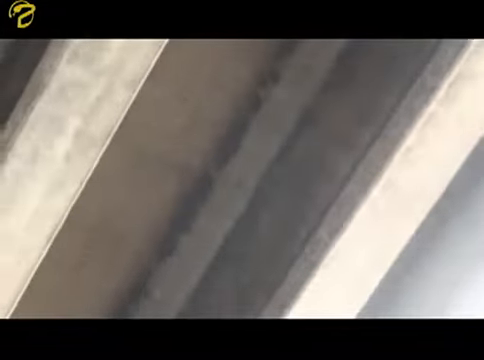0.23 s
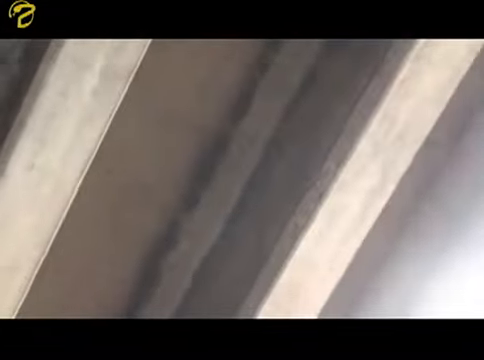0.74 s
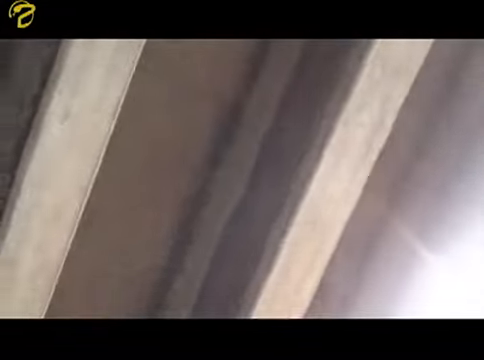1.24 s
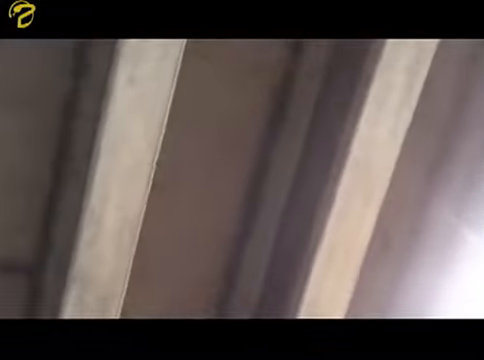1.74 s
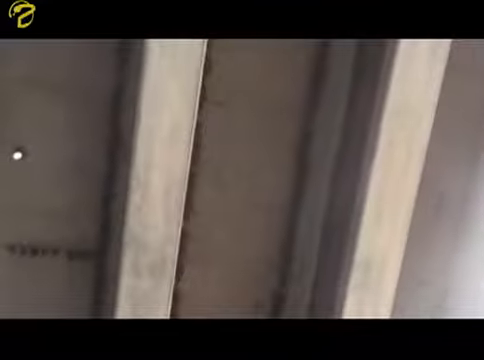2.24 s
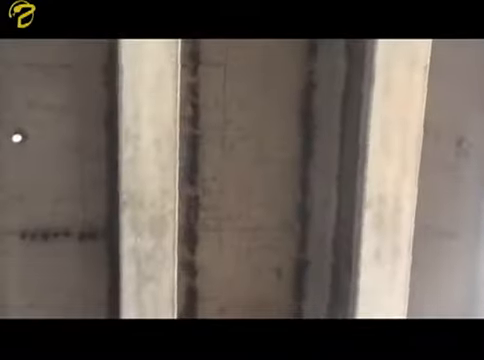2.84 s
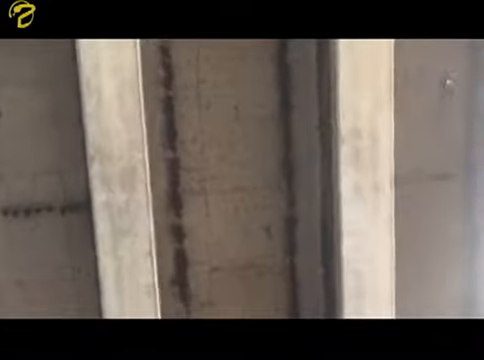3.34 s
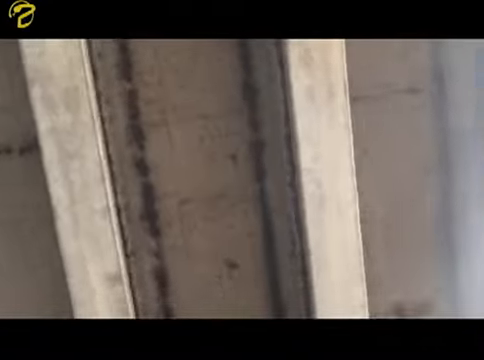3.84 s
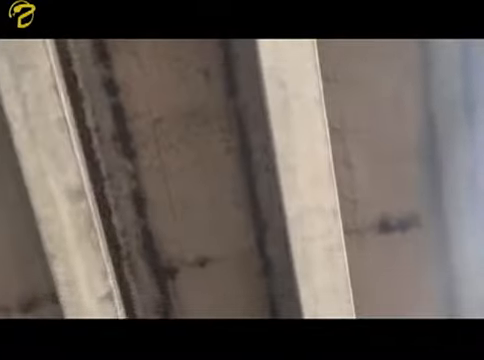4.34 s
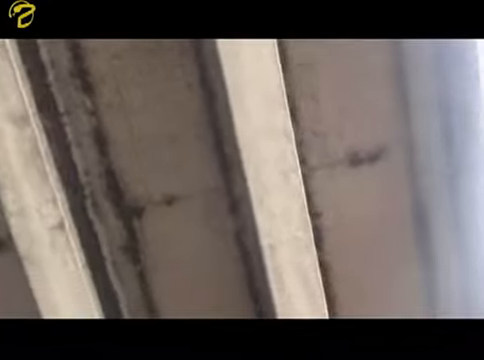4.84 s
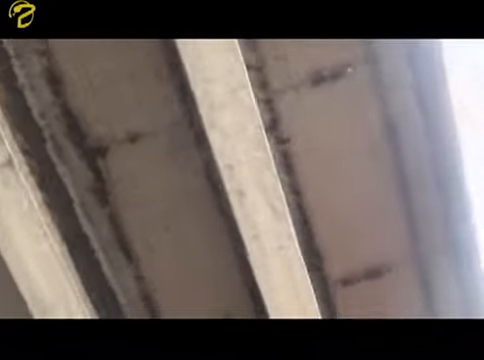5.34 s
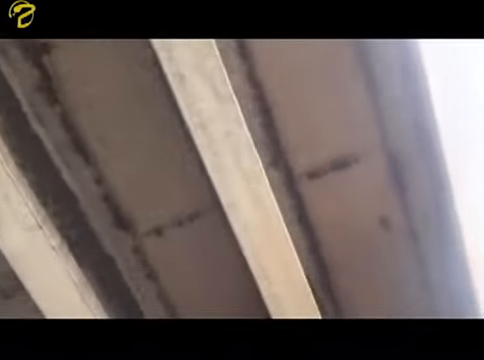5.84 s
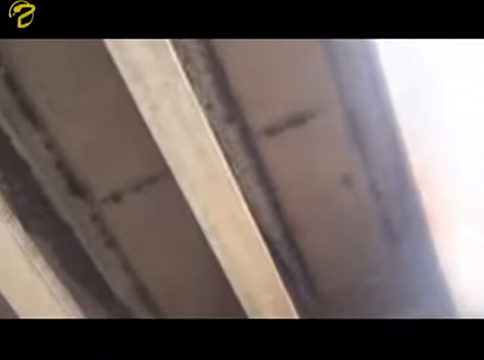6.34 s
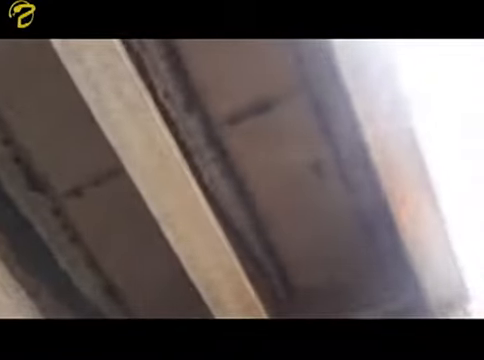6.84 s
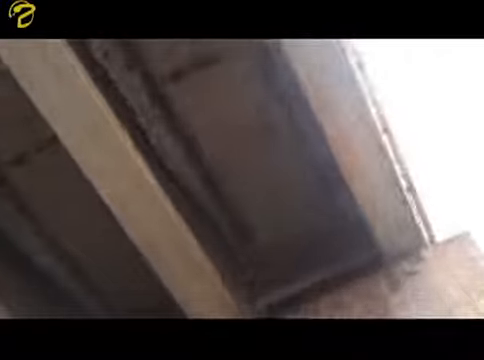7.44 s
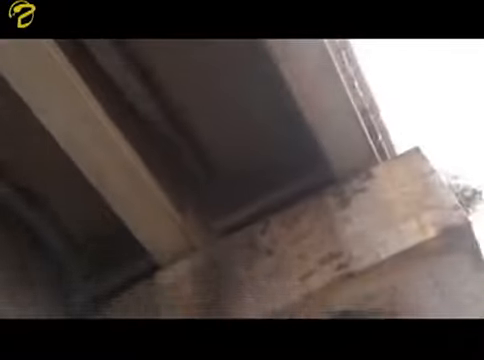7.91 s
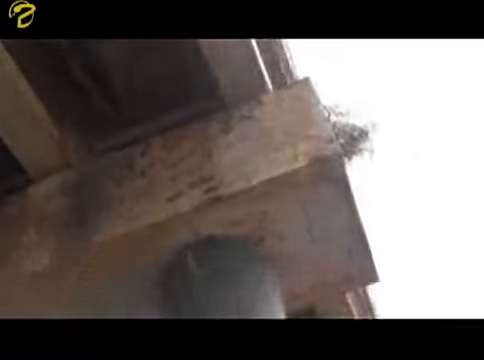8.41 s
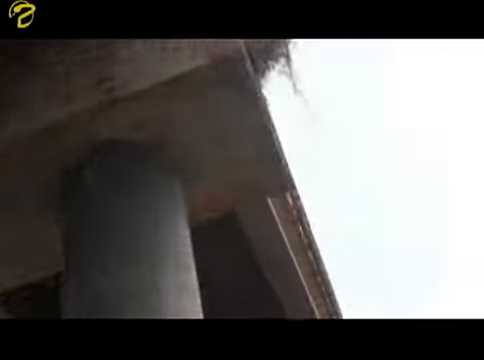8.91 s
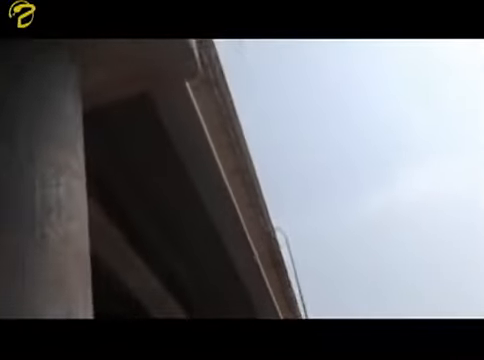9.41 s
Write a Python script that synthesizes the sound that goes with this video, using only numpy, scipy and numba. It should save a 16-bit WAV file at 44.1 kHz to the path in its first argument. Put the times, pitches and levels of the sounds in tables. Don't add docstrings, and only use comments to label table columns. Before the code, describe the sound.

Thousands of bats packed in bridge joints squeak without pause, blurring into a bright, sizzling wash with short clear chirps and a few trills on top. Traffic hums low and hollow through the concrete deck. A handheld microphone below picks up small finger knocks and rubs after six seconds, and the roost softens slightly near the end.

```python
import sys
import numpy as np
from scipy import signal
from scipy.io import wavfile
from scipy.ndimage import uniform_filter1d
from numba import njit

SR = 44100
rng = np.random.default_rng(int(sys.argv[2]) if len(sys.argv) > 2 else 0)


def gain_from_db(level_db):
    decades = np.asarray(level_db, float) / 20
    return 10 ** decades


def dump_mix(stems):
    frames = np.atleast_2d(stems).T
    limited = np.clip(frames, -1, 1)
    pcm = np.round(limited * 32767).astype(np.int16)
    wavfile.write(sys.argv[1], SR, pcm)


N = 426438

# (time [s], level [dB])
ROOST_LEVEL = [(0, -25), (.8, -25), (1.6, -24.5), (2.5, -24.5), (3.3, -25), (4, -25.5), (4.8, -25),
               (5.6, -25.5), (6.3, -25.5), (6.7, -25), (7.2, -25), (7.8, -26), (8.4, -26.5), (9, -28),
               (9.67, -28.5)]
VOICE_HZ = [5800, 8640, 12800]
VOICES_FOLLOW = [0.47, 0.79, 1]
# (frequency [Hz], density [dB per Hz])
THROATS = [(1500, -27), (2500, -20.5), (3300, -15.5), (4200, -10.5), (4900, -5.5), (6000, -2), (7100, -5),
           (9300, -0.5), (10500, -4), (11800, -11.5), (13000, -16.5), (15000, -21.5), (16000, -52)]
# (frequency [Hz], level [dB])
PORTS_APART = [(3000, 3.5), (6500, 2), (9500, 4), (12000, 5), (15000, -11)]
# (time [s], echo that differs left to right [dB], left over right [dB])
ROOST_WIDTH = [(0, -18, 0), (2.5, -21, -0.3), (4.501, -21, 1), (6.5, -19.5, 1.6), (9.67, -17, 2.5)]
# (time [s], length [s], pitch [Hz], level over the usual near bat [dB])
NEAR = [(0.022, 0.0086, 5340, 7), (.372, .022, 5590, 2), (0.482, 0.038, 5440, 4), (0.546, 0.022, 5030, 6),
        (0.697, .016, 11540, 2), (0.958, 0.02, 7530, 6), (1.067, 0.052, 5300, 3), (1.133, .02, 5300, -5),
        (2.068, 0.061, 5910, 1), (2.107, 0.022, 11230, 5), (2.126, .012, 6260, 9), (2.487, 0.025, 7400, 7),
        (2.502, .036, 6400, 3), (2.563, 0.053, 7560, -1), (3.342, 0.026, 9500, 5), (3.664, 0.025, 8050, 3),
        (4.11, 0.043, 6070, 2), (5.094, 0.076, 5400, 1), (5.286, 0.023, 7400, -5), (5.326, .027, 6300, -3),
        (5.925, 0.0142, 5800, -1), (6.422, 0.062, 11810, 7), (6.42, 0.075, 5500, 3),
        (6.797, 0.011, 9020, 6), (7.235, 0.032, 6370, 3), (7.474, .025, 8060, 5), (7.781, 0.042, 10650, 6),
        (8.885, 0.025, 7940, 4), (9.103, .026, 10190, 3), (9.525, 0.045, 9070, 3),
        (.375, .034, 11240, 2), (0.503, .018, 8350, 2), (.507, .024, 11800, -2), (.671, 0.016, 12920, 4),
         (0.68, .017, 5170, 4), (0.886, .04, 7410, 4), (0.896, .018, 13500, 3), (1.364, .037, 13680, 6),
         (1.446, .018, 5680, 3), (2.282, .02, 9990, -1), (2.311, .03, 13260, 5), (2.532, .026, 13600, 4),
         (2.562, .017, 6890, 2), (1.1, 0.045, 5550, 1), (3.292, 0.028, 13520, 5), (4.016, .018, 7750, 6),
         (4.114, 0.033, 10420, 2), (4.607, 0.029, 4830, 4), (4.698, 0.021, 4720, 5),
         (5.281, 0.028, 7150, 6), (5.501, 0.067, 4740, 4), (5.519, 0.041, 5150, 0), (6.464, .02, 6460, -1),
         (7.193, .015, 12400, -3), (7.393, .03, 5770, 3), (7.624, .02, 5600, 4), (8.174, .039, 11450, 2),
         (8.352, .014, 7840, 7), (.611, .018, 12200, 2), (3.884, .014, 12140, 4)]
# (time [s], length [s], pitch [Hz], level over the usual near bat [dB])
PEEPS = [(.154, .058, 2230, 3), (.356, .065, 3240, -1), (1.011, .017, 2070, 4), (1.366, .018, 2430, 3),
         (1.827, .082, 2370, 0), (1.985, .044, 2300, 2), (6.428, .012, 3720, -5), (7.261, .014, 3460, -5),
         (7.63, .09, 3250, -3), (7.945, .025, 3280, 0), (8.717, .012, 4000, -4)]
# (start [s], end [s], pitch [Hz], glide of each syllable [Hz], level over the usual near bat [dB])
TRILLS = [
    (2.985, 3.149, 11250, 392, 10),
    (4.598, 4.824, 4750, -9, 8.5),
    (7.733, 7.786, 10300, -250, 4),
    (8.912, 8.95, 7700, -350, 8),
]
# (time [s], level [dB])
TRAFFIC_LOAD = [(0, 0), (.4, -1), (.75, -4), (1.2, 0), (1.95, -0.5), (2.12, -4.5), (2.25, 1.5),
                (2.65, -0.5), (3.5, 1.5), (4.05, 2.5), (4.25, 1.5), (4.5, 0), (5.3, -0.5), (6.2, -2),
                (6.8, -2.5), (7.8, -3), (8.8, -4.5), (9.67, -2.5)]
TRAFFIC_HZ = [120, 310, 510, 1500]
LAYERS_FOLLOW = [1.26, 1.06, 0.77, 0.83]
# (frequency [Hz], density [dB per Hz])
ROAD = [(20, -36), (50, -37), (65, -20), (120, -9.5), (250, -9.5), (500, -9), (900, -12), (2000, -13.5),
        (3200, -21.5), (6000, -22)]
# (frequency [Hz], width [Hz], gain [dB])
BAYS = [(208, 19, 1.5), (298, 76, 5.5), (340, 62, 5.5), (419, 35, -5.5), (470, 28, 5.5), (540, 33, 3),
        (665, 40, 0)]
# (frequency [Hz], side over mid [dB])
ROAD_SIDE = [(200, -9.5), (380, -15), (700, -13.5), (1300, -12.5), (3000, -14.5)]
# (time [s], level added to the side [dB])
RUMBLE_WIDTH = [(0, -12), (3.5, 0), (5.5, -10), (6.5, -17), (9.67, -19)]
# (time [s], turn [0-1])
OPEN_SKY = [
    (0, 0),
    (4, 0.75),
    (6, 0.47),
    (6.8, 1),
    (9.67, 0.5),
]
SKY_GAIN_DB = [-3, -3, -2, 0.6]
# (start [s], end [s], first pitch [Hz], last pitch [Hz], level [dB])
DRONES = [(-.4, 1.08, 208, 208.4, -38.5), (-.3, 6.5, 49, 49.1, -71), (-.3, 3.3, 292, 286, -43.5),
          (-.3, 2.3, 312, 307.4, -45.5), (-.3, 2.15, 358, 351.6, -42.5), (2.05, 6.8, 458, 462, -46),
          (1.4, 6.61, 540, 546, -47), (1.4, 6, 648, 664, -57), (2.201, 4.4, 1105, 1107, -48.5),
          (3.0, 5.5, 480, 483, -44), (3.0, 4.2, 359.5, 347, -59), (3.3, 5.1, 177, 172.4, -46.5),
          (3.3, 8.8, 123, 120.5, -62), (3.6, 8, 332, 334, -52), (6.5, 9.9, 340, 318.3, -57)]
# (start [s], length [s], level [dB])
BREEZE = [
    (3.45, 0.48, -46),
    (9.05, .42, -47),
]
# (time [s], peak [dB], ring [Hz], brightness [dB])
KNOCKS = [(6.318, -24, 523, -22), (6.36, -27, 393, -10), (6.335, -32, 760, -20), (6.367, -25, 812, -3),
          (6.371, -23, 480, -14), (6.392, -26, 181.7, -18), (7.25, -26, 340, -12), (7.638, -30, 330, -20),
          (7.729, -29, 326, -20), (7.84, -33, 1080, -9), (7.842, -35, 600, -20), (7.94, -33, 330, -20),
          (8.305, -32, 520, -20), (8.316, -27.5, 800, -10), (8.322, -31, 544, -8), (8.338, -32, 850, -5),
          (8.344, -28, 520, -12), (8.916, -31, 480, -22), (8.927, -28, 470, -14), (8.94, -30, 420, -7),
          (8.962, -29, 620, -20), (8.974, -30, 680, -20), (8.986, -29, 730, -18), (8.998, -30, 750, -16),
          (9.025, -30, 500, -12), (9.045, -28, 310, -20), (9.058, -30, 300, -22), (9.31, -31, 200, -22),
          (9.34, -33, 480, -20)]
# (frequency [Hz], threshold [standard deviations])
DROPOUTS = [(1000, 2.6), (2600, 1.6), (5000, 3.0), (10500, 2.4), (12500, 1.1), (15000, .75)]

TRILL_GAP_S, SYLLABLE_S = 0.0258, 0.0092
NEAR_DB, NEAR_COLOUR, NEAR_GLIDE = -27.5, 0.64, 0.026
STRAYS, STRAY_DB = 45, -2
HUM_DB, LAYERS_DRIFT_DB = -38.5, 0.7


def evened(x):
    return x / np.sqrt(np.mean(x ** 2) + 1e-20)


def curve(points, t):
    return np.interp(t, *np.transpose(points))


def read(points, hz):
    f, value = np.transpose(points)
    return np.interp(np.log(hz + 1), np.log(f + 1), value)


def layered(centres_hz, layers_db, hz):
    share = np.array([read(list(zip(centres_hz, one)), hz) for one in np.eye(len(centres_hz))])
    return share.T @ np.array(layers_db)


def drift(count, frames, span):
    return evened(uniform_filter1d(rng.standard_normal((frames, count)).T, span, 1))


def patchy(bins, frames, tall, long):
    grain = rng.standard_normal((frames, bins)).T
    return evened(uniform_filter1d(uniform_filter1d(grain, tall, 0), long, 1))


@njit
def add(mix, calls, wobble, rate):
    for s, length, hz, glide, size, rough in calls:
        first, count = int(s * rate), int(length * rate)
        for k in range(max(0, -first), min(count, len(mix) - first)):
            u = k / count
            turn = 2 * np.pi * length * u * (hz + glide * (u - 1) / 2)
            envelope = np.sqrt(np.sin(np.pi * u))
            mix[first + k] += size * envelope * np.sin(turn + rough * wobble[first + k])


def squeaks(calls):
    mix = np.zeros(N)
    wobble = 2.2 * evened(uniform_filter1d(rng.standard_normal(N), 60))
    add(mix, np.ascontiguousarray(calls, dtype=float), wobble, float(SR))
    return mix


def girders(x, t60):
    length = SR // 4
    taps = rng.choice([-1., 1.], (2, length)) * (rng.random((2, length)) < 0.05)
    tail = taps * gain_from_db(-60 * np.arange(length) / SR / t60)
    tail /= np.linalg.norm(tail, axis=1, keepdims=True)
    return signal.oaconvolve(x[None], tail, axes=1)[:, :N]


def chatter(count=2900):
    start, pitch, short, glide, loud, rough, many, gap = rng.random((count, 8)).T
    length = 0.004 * 5.5 ** short
    rows = []
    for k in range(3):
        s = 10.1 * start - 0.3 + k * (length + 0.006 + 0.02 * gap)
        hz = (2400 + 13800 * pitch) * (1 + 0.0252 * rng.standard_normal(count))
        sung = k <= 3 * many
        size = gain_from_db(-np.log(np.clip(loud, 0.03, 1))) * sung
        rows.append(np.transpose([s, length, hz, 1300 * (glide - 0.55), size, 0.6 * rough]))
    return evened(squeaks(np.vstack(rows)))


def neighbours():
    start, short, pitch = rng.random((STRAYS, 3)).T
    stray_length = 0.012 * 4 ** short
    strays = np.c_[start * N / SR, stray_length, 4500 + 10500 * pitch, np.full(STRAYS, STRAY_DB)]
    rows = np.vstack([NEAR, PEEPS, strays])
    glides = NEAR_GLIDE * rows[:, 2] * rng.uniform(-1.33, 1, len(rows))
    rows = np.insert(rows, 3, glides, axis=1)
    for start, end, hz, glide, over_db in TRILLS:
        s = np.arange(start, end, TRILL_GAP_S)
        progress = (s - start + SYLLABLE_S) / (end - start + SYLLABLE_S)
        swell_db = 8 * (np.sin(np.pi * progress) - 1)
        pitches = hz + 1500 * (s - s.mean())
        trill = [(a, SYLLABLE_S, p, glide, over_db + b) for a, p, b in zip(s, pitches, swell_db)]
        rows = np.r_[rows, trill]
    rows[:, 4] = gain_from_db(NEAR_DB + NEAR_COLOUR * read(THROATS, rows[:, 2]) + rows[:, 4])
    return squeaks(np.c_[rows, np.full(len(rows), 0.35)])


def colony():
    t = np.arange(N) / SR
    joints = [chatter() for _ in range(4)]
    crowd = sum(joints) / 2
    echo, apart = sum(girders(joint, 0.3) for joint in joints) / 2
    far = rng.standard_normal((2, N))
    mid = evened(crowd + gain_from_db(1.6) * echo + gain_from_db(3.0) * far[0])
    side = evened(apart + gain_from_db(-1.0) * far[1])

    hz, frames, z = signal.stft(np.array([mid, side]), SR, nperseg=512)
    z[1] *= gain_from_db(read(PORTS_APART, hz))[:, None]
    squabbles = patchy(len(hz), len(frames), 14, 12)
    z *= gain_from_db((0.2 + 1.2 * (hz > 11500))[:, None] * squabbles)
    usual_db = np.mean(np.transpose(ROOST_LEVEL)[1])
    swell_db = curve(ROOST_LEVEL, frames) - usual_db
    voices = usual_db + np.outer(VOICES_FOLLOW, swell_db) + 0.24 * drift(3, len(frames), 40)
    colour = gain_from_db(read(THROATS, hz))
    colour /= np.sqrt(np.mean(colour ** 2 * (hz > 7500) * (hz < 11500)))
    z *= colour[:, None] * gain_from_db(layered(VOICE_HZ, voices, hz) - 1.59)
    mid, side = signal.istft(z, SR)[1][:, :N]

    near = neighbours()
    mid = mid + near + gain_from_db(-16.0) * girders(near, 0.6)[0]
    times, width_db, pan_db = np.transpose(ROOST_WIDTH)
    side = side * gain_from_db(np.interp(t, times, width_db))
    pan = gain_from_db(np.interp(t, times, pan_db) / 2)
    return np.array([mid * pan + side, mid / pan - side])


def traffic():
    frames, hz = N // 512 + 5, np.fft.rfftfreq(2048, 1 / SR)
    t = np.arange(frames) * 512 / SR
    a, b = rng.standard_normal((frames, len(hz), 2, 2)).T
    patches = patchy(len(hz), frames, 20, 8)
    gusts = evened(uniform_filter1d(rng.standard_normal(frames), 4))
    bays_db = sum(db / (1 + (2 * (hz - f) / width) ** 2) for f, width, db in BAYS)
    colour = gain_from_db(read(ROAD, hz) + bays_db)
    z = (a + 1j * b) * colour[:, None] * gain_from_db(1.2 * patches + 0.75 * gusts)

    bass = np.clip(np.log2(500 / (hz + 1)) / 1.5, 0, 1)[:, None]
    turning_db = curve(RUMBLE_WIDTH, t)
    z[1] *= gain_from_db(read(ROAD_SIDE, hz)[:, None] + bass * turning_db)
    in_bay = ((hz > 240) & (hz < 400))[:, None]
    bay = signal.istft(z[0] * in_bay, nperseg=2048, noverlap=1536)[1]

    early = t - 1024 / SR
    load_db = np.outer(LAYERS_FOLLOW, curve(TRAFFIC_LOAD, early))
    turned_db = np.outer(SKY_GAIN_DB, curve(OPEN_SKY, early) - 0.5)
    layers = HUM_DB + load_db + turned_db + LAYERS_DRIFT_DB * drift(4, frames, 16)
    z *= gain_from_db(layered(TRAFFIC_HZ, layers, hz)) / bay.std()
    mid, side = signal.istft(z, nperseg=2048, noverlap=1536)[1][:, :N]
    return np.array([mid + side, mid - side])


def drones():
    out = np.zeros(N)
    t = np.arange(N) / SR
    for start, end, first_hz, last_hz, level_db in DRONES:
        u = np.clip((t - start) / (end - start), 0, 1)
        beat = uniform_filter1d(rng.standard_normal((2, N // 100 + 1)), 26, 1)
        beat = 0.58 * evened(uniform_filter1d(np.repeat(beat, 100, 1)[:, :N], 800, 1))
        turn = 2 * np.pi * np.cumsum(first_hz + (last_hz - first_hz) * u) / SR
        swell = np.minimum(4 * u * (1 - u) * 2.2, 1)
        tone = (1 + beat[0]) * np.sin(turn) + beat[1] * np.cos(turn)
        out += gain_from_db(level_db - 1.5) * swell * tone
    return out


def breeze():
    t = np.arange(N) / SR
    low_band = signal.butter(1, [40, 220], "bandpass", fs=SR)
    air = evened(signal.lfilter(*low_band, rng.standard_normal(N)))
    puffs = sum(gain_from_db(db) * np.sin(np.pi * np.clip((t - s) / length, 0, 1)) for s, length, db in BREEZE)
    return air * puffs


def knocks():
    out, t = np.zeros(N), np.arange(2500) / SR
    dull, bright = rng.standard_normal((2, len(KNOCKS), len(t)))
    dull = signal.lfilter(*signal.butter(1, [200, 1000], "bandpass", fs=SR), dull)
    bright = signal.lfilter(*signal.butter(2, [900, 2600], "bandpass", fs=SR), bright)
    push = (t / 0.004 * np.exp(1 - t / 0.004)) ** 1.6
    drag = t / 0.0075 * np.exp(1 - t / 0.0084)
    for (s, peak_db, hz, bright_db), low, high in zip(KNOCKS, dull, bright):
        ring = push * (np.sin(2 * np.pi * hz * t) + 1.2 * gain_from_db(bright_db) * evened(high))
        rub = 0.3 * drag * evened(low)
        first = round(s * SR)
        out[first:first + len(t)] += gain_from_db(peak_db) * (ring + rub)
    return out


def scene():
    return colony() + traffic() + drones() + breeze() + knocks()


def dropouts(x):
    hz, frames, z = signal.stft(x, SR, nperseg=1024)
    luck = patchy(len(hz), len(frames), 4, 4)
    loss_db = np.clip(150 * (luck - read(DROPOUTS, hz)[:, None]), 0, 40)
    return signal.istft(z * gain_from_db(-loss_db), SR)[1][:, :N]


def band_limit(x):
    return signal.sosfilt(signal.butter(12, 15962, fs=SR, output="sos"), x)


def record(dry):
    mix = dropouts(dry)
    return band_limit(mix)


dry = scene()
out = record(dry)
dump_mix(out)
```